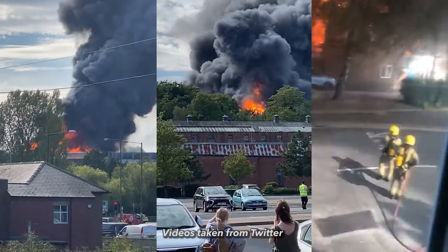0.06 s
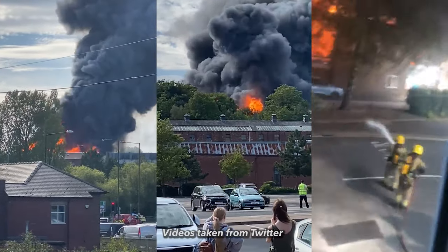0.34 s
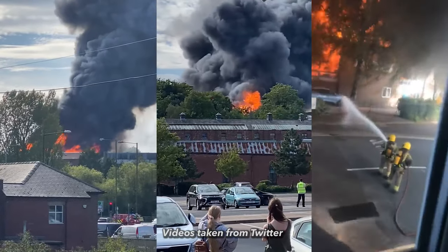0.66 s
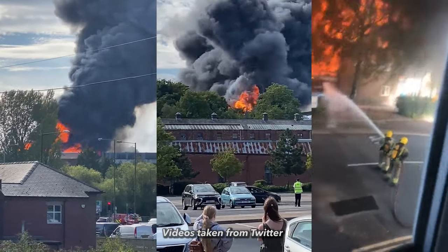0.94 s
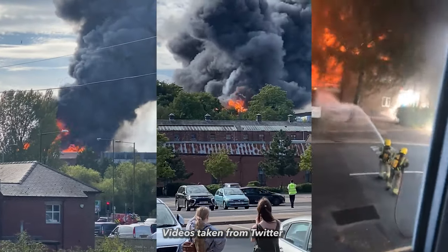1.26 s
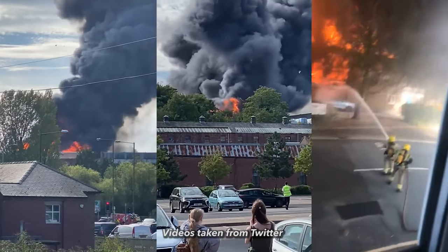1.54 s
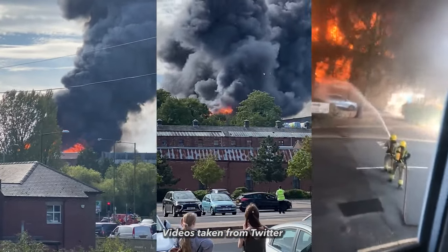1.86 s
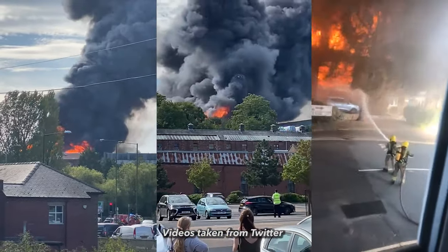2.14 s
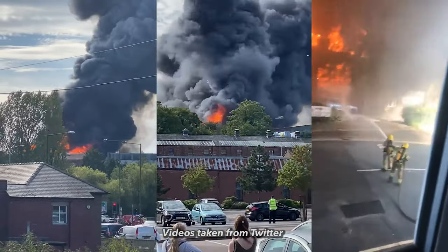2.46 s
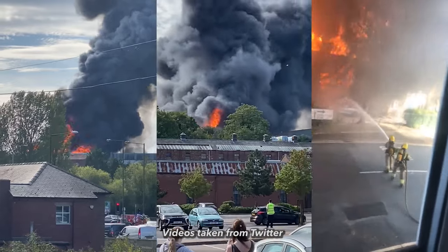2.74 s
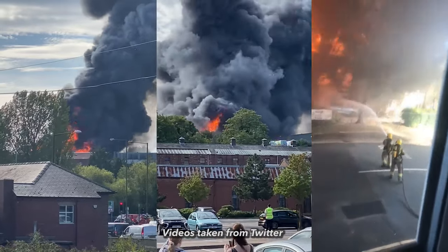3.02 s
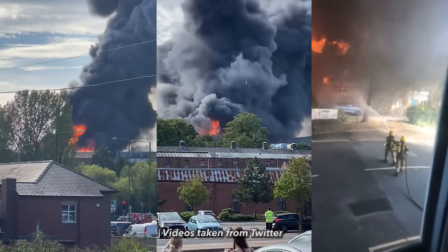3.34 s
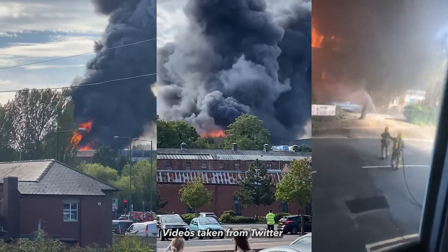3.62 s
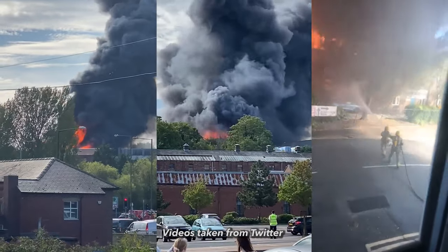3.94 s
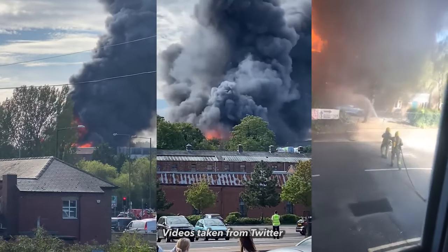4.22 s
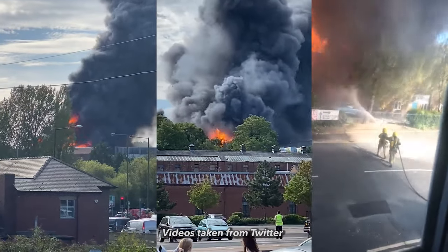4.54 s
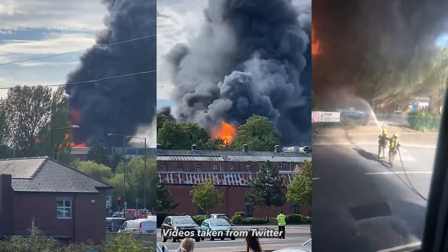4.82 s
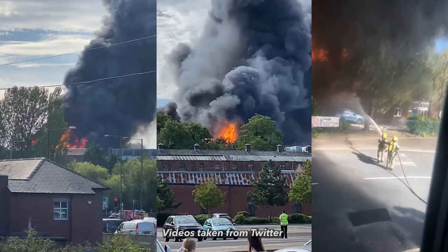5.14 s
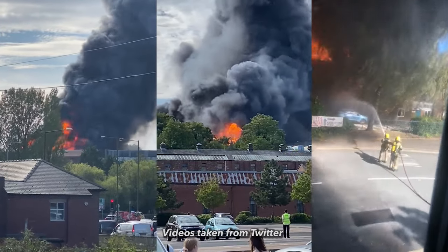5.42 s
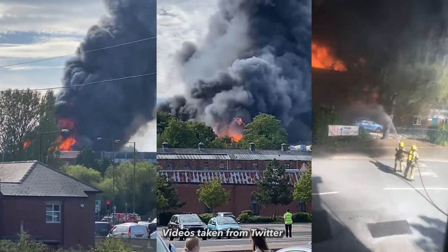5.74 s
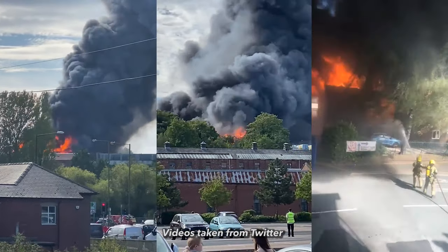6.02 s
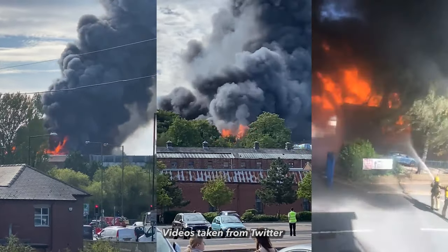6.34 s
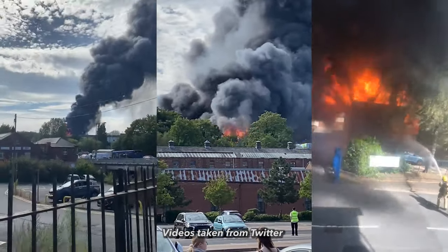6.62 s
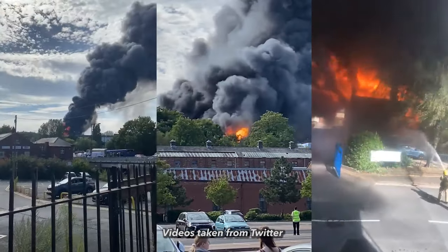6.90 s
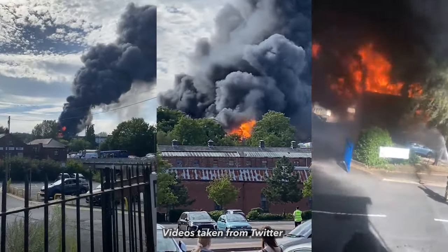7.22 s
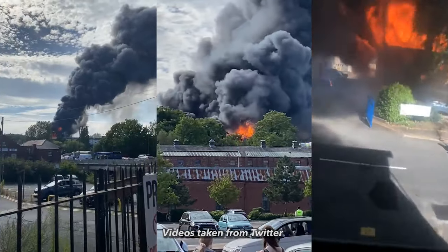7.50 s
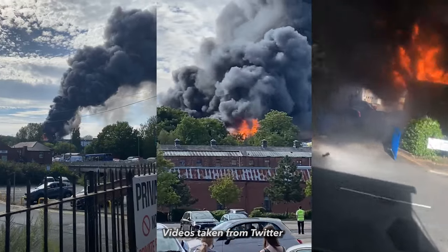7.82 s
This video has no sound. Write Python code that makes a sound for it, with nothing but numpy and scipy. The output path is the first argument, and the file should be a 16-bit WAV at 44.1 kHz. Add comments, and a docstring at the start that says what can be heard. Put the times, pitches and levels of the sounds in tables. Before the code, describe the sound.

A large building burns some way off, heard outdoors. A deep, gusting rumble and a fluttering roar of flames continue throughout, with soft sizzling, a very faint high hiss and a few tiny ticks. In the first second, deep thumps of flaring gas mix with quick cracks and hollow bangs, strongest at about 0.5 and 1.2 seconds, echoing off surrounding buildings. The roar swells briefly near 2.2 seconds. Duller bangs and thumps come with a heavier rumble around 3 to 3.5 seconds. A lull follows, with two faint, far, rising whines between 4 and 4.8 seconds. A sharp crack at about 4.8 seconds and its loud echo begin a denser run of irregular bangs, pops and low thumps, as the fire grows a little stronger. One of the loudest bangs lands near 7.6 seconds, over the continuing rumble.

```python
"""A large building on fire

A building burns some way off, heard outdoors. Billowing fire rumbles, flames roar, sizzle and pop,
and flaring gas gives deep thumps. Bursting things crack and bang, the buildings around throw the
bangs back, some loudly, and the roar briefly swells. A thin hiss, ticks and far whines sound faintly."""
import sys
import numpy as np
from scipy import signal
from scipy.fft import rfft, irfft, next_fast_len
from scipy.io import wavfile
from scipy.ndimage import uniform_filter1d

SR = 44100
rng = np.random.default_rng(int(sys.argv[2]) if len(sys.argv) > 2 else 0)


def unload_audio(sound):
    """Save the sound as a 16-bit wav file, at the path given as the first command line argument."""
    columns = np.transpose(np.atleast_2d(sound))
    # keep every value between -1 and 1, then stretch to whole-number steps
    steps = np.round(np.clip(columns, -1, 1) * 32767)
    wavfile.write(sys.argv[1], SR, steps.astype(np.int16))


N = 346626
TIME = np.arange(N) / SR

# how strongly the blaze rumbles: (time [s], level [dB])
BLAZE = [(0.0, -35.5), (0.65, -28), (0.98, -35.5), (2.69, -38.5), (3.17, -29.5), (3.55, -38), (4.71, -37.5),
         (5.17, -34.5), (5.34, -32), (6.15, -29), (6.83, -35), (7.46, -29.5), (7.86, -30.5)]


def from_db(db):
    """Turn decibels into a number to multiply a sound by."""
    return 10 ** (np.asarray(db) / 20)


def unit_power(x):
    """Scale a sound to an average power of 1."""
    return x / np.sqrt(np.mean(x ** 2) + 1e-20)


def in_time(points):
    """Join (time, value) points with straight lines."""
    return np.interp(TIME, *np.transpose(points))


def at_hz(points, hz):
    """Read between (frequency, value) points, with octaves evenly spaced."""
    known_hz, values = np.transpose(points)
    return np.interp(np.log(hz + 1), np.log(known_hz), values)


def frequencies(size):
    """The frequencies in the spectrum of `size` samples."""
    return np.arange(size // 2 + 1) * SR / size


def drift(rate_hz):
    """A smooth random wobble, about 1 in size; a higher rate wobbles faster."""
    step, warm_up = 40, 2000
    pole = np.exp(-2 * np.pi * step * rate_hz / SR)
    slow = signal.lfilter([1], [1, -2 * pole, pole * pole], rng.standard_normal(N // step + warm_up + 2))
    slow = unit_power(slow[warm_up:])
    return np.interp(np.arange(N) / step, np.arange(len(slow)), slow)


def colour(x, gain_db, size):
    """Turn frequencies up or down so that nothing sounds before its cause (minimum phase)."""
    cepstrum = irfft(np.log(from_db(gain_db)), size)
    cepstrum[1:size // 2] *= 2
    cepstrum[size // 2 + 1:] = 0
    return irfft(rfft(x, size) * np.exp(rfft(cepstrum)), size)


def evened(x, band_bins=48):
    """Give a short noise equal power in every broad band; its fine grain stays."""
    power = uniform_filter1d(np.mean(np.abs(rfft(x)) ** 2, axis=0), band_bins)
    return colour(x, 10 * np.log10(power.mean() / power), x.shape[-1])


def spread(pair, spectrum):
    """Turn two unrelated signals into one stereo sound with the given spectrum."""
    # how alike left and right are: (frequency [Hz], likeness [0-1])
    likeness = [(50, .95), (130, .83), (260, .85), (500, .8), (1000, .76), (2000, .9), (4000, .94),
                (10000, .3)]
    size = next_fast_len(N, True)
    hz = frequencies(size)
    alike = at_hz(likeness, hz)
    mid, side = rfft(pair, size) * from_db(at_hz(spectrum, hz))
    stereo = np.sqrt(1 + alike) * mid + np.sqrt(1 - alike) * side * [[1], [-1]]
    return unit_power(irfft(stereo, size)[:, :N])


def noise(spectrum):
    """Steady stereo noise."""
    return spread(rng.standard_normal((2, N)), spectrum)


def add(track, start_s, sound):
    """Mix a sound into a track."""
    start = max(round(start_s * SR), 0)
    track[..., start:start + sound.shape[-1]] += sound[..., :N - start]


def rumble(level_db=2.5, gust_db=2.0):
    """The column of fire billows: deep noise that swells with the blaze and shakes in gusts."""
    # the rumble's tone: (frequency [Hz], level [dB])
    rumble_spectrum = [(20, -43.5), (30, -27.5), (42, -2.5), (60, 3), (80, -1), (110, -11), (160, -13),
                       (300, -34), (700, -96)]
    return from_db(in_time(BLAZE) + level_db + gust_db * drift(4.4)) * noise(rumble_spectrum)


def pops(spectrum, per_s, range_db, decay_s):
    """Many small bursts of random size, each smeared on its way to us."""
    starts = rng.random(N) < per_s / SR
    power = starts * from_db(range_db * rng.random(N)) ** 2
    envelope = np.sqrt(signal.lfilter([1], [1, -np.exp(-2 / (decay_s * SR))], power + 1e-12))
    return spread(envelope * rng.standard_normal((2, N)), spectrum)


def flames(rumble_nudge=0.085, sizzle_follows=1.6):
    """Swirling flames roar, sizzle and pop; dull thuds deep inside rise and fall with the roar."""
    # how strongly the flames roar: (time [s], level [dB])
    roar_levels = [(0.0, -36.5), (1.62, -35.5), (2.55, -38.5), (3.11, -37.5), (4.7, -38.5), (5.45, -33.5),
                   (6.04, -34.5), (6.35, -37.5), (7.66, -37), (7.86, -34.5)]
    # the tone of the roar, thuds and sizzle: (frequency [Hz], level [dB])
    roar_spectrum = [(60, -2.5), (140, -13.5), (220, 0), (380, -0.5), (540, -3.5), (780, 0), (1150, -7),
                     (1550, -8.5), (2100, -22), (3500, -40.5), (7000, -76.5)]
    thud_spectrum = [(50, -27), (100, 9), (260, -1), (420, -4), (3000, -93)]
    sizzle_spectrum = [(700, -20), (1500, -9.5), (2100, 5), (3000, -4.5), (4000, -11.5), (5100, -16),
                       (6200, -24.5), (7200, -45.5)]
    roar_db, rumble_db = in_time(roar_levels), in_time(BLAZE)
    thud_db = -4 + rumble_nudge * (rumble_db - rumble_db.mean())
    sizzle_db = -54 + sizzle_follows * (roar_db - roar_db.mean())
    flutter_db = 1.33 * drift(13.4)
    roar = from_db(-1) * noise(roar_spectrum)
    roar += from_db(-7.5) * pops(roar_spectrum, per_s=56, range_db=11.5, decay_s=0.013)
    thuds = from_db(thud_db) * pops(thud_spectrum, per_s=22, range_db=16, decay_s=0.016)
    sizzle = from_db(-2.5) * noise(sizzle_spectrum)
    sizzle += from_db(-8.5) * pops(sizzle_spectrum, per_s=34, range_db=8, decay_s=0.034)
    return from_db(roar_db + flutter_db) * (roar + thuds) + from_db(sizzle_db + flutter_db) * sizzle


def hiss(swell_s=0.039, level_db=2.5):
    """A thin, high hiss that swells now and then."""
    # its slow rise and fall, and its brief swells: (time [s], level [dB])
    hiss_levels = [(0.0, -80), (0.68, -77.5), (3.13, -87.5), (6.24, -79.5), (6.98, -87.5), (7.86, -83.5)]
    swell_peaks = [(2.75, -75), (5.61, -73)]
    # its tone: (frequency [Hz], level [dB])
    hiss_spectrum = [(6500, -61), (8500, -7.5), (10000, -7), (11800, -11), (13500, -31), (16000, -37)]
    swells = sum(from_db(db) * np.exp(-((TIME - peak_s) / swell_s) ** 2) for peak_s, db in swell_peaks)
    return (from_db(in_time(hiss_levels) + level_db) + swells) * noise(hiss_spectrum)


def bangs(level_db=27, crack_db=-8, shock_s=0.00083, ring_width_hz=68, size=6144):
    """A bang is a shock and a short tearing noise, then a crackling scatter off the wreckage."""
    # bangs, their loud echoes off the buildings (1.266, 4.97, 5.372 s) and a brief, soft swell of
    # the roar (2.19 s): (time [s], strength [dB], hollow ring [Hz], upper ring [Hz], bass [dB],
    # rise [s], scatter decay [s], dulling [dB; below 0 is sharper])
    events = [(.069, -19, 560, 1180, -3.5, 0.002, 0.022, 22.5),
              (.109, -17.5, 700, 1460, -14, 0.0016, 0.032, -2.5),
              (.223, -19.5, 790, 1370, -9, 0.0015, 0.017, 9),
              (.456, -16.5, 775, 1390, -2.5, 0.0079, 0.044, 0.5),
              (.481, -12.5, 746, 1330, 1.5, 0.0025, 0.0095, 6),
              (.537, -24, 1390, 2450, -7, 0.00079, 0.0072, -4),
              (1.001, -23.5, 422, 1260, -3.5, 0.0015, 0.0044, 9.5),
              (1.03, -22.5, 302, 1520, 6, 0.0096, 0.014, 8),
              (1.148, -11.5, 770, 1540, 0.5, 0.0023, 0.017, -3),
              (1.162, -13, 770, 1520, -3, 0.0012, 0.0093, 2.5),
              (1.266, -17, 820, 1194, -1, 0.0035, 0.012, 8.5),
              (1.576, -18, 666, 1110, -2, 0.0023, 0.019, 5.5),
              (1.718, -19.5, 570, 1680, 0, 0.0021, .028, 3),
              (1.818, -19.5, 427, 1190, 2, 0.0028, 0.0092, 30),
              (2.19, -18, 830, 1380, -10.5, 0.021, 0.23, 12.5),
              (2.577, -22.5, 480, 1620, 1, 0.0012, 0.012, 7),
              (2.832, -27, 510, 1275, 4.5, 0.0029, 0.017, 2),
              (3.051, -18, 258, 1690, 7, 0.0019, 0.019, 10.5), (3.177, -20, 446, 1415, 6, 0.0064, .03, 4),
              (3.346, -27.5, 285, 1470, 15.5, 0.0097, 0.014, 7),
              (4.838, -9.5, 770, 1930, -10.5, 0.0023, 0.014, -1.5),
              (4.891, -29, 780, 2600, -2.5, .002, 0.0071, -7),
              (4.952, -16, 870, 2000, -9.5, 0.0028, 0.0058, 15),
              (4.97, -14, 810, 1950, 0, .002, 0.039, 3.5), (5.242, -11.5, 665, 2480, -6, 0.0017, 0.004, 4),
              (5.267, -20, 397, 1350, 2, 0.0018, 0.03, -4.5),
              (5.372, -21, 350, 1890, 5.5, 0.0043, 0.0083, -4.5),
              (5.405, -21.5, 380, 1360, -7, 0.0037, 0.027, 1),
              (5.469, -23.5, 338, 1450, 5, 0.0069, 0.017, 5.5),
              (5.651, -26, 297, 1390, 9.5, 0.0033, 0.0051, 29),
              (5.775, -26, 290, 1280, 16, 0.01, 0.012, 29.5),
              (5.809, -13.5, 864, 2060, -6.5, 0.0021, 0.034, 3.5),
              (5.848, -20, 745, 1250, -3.5, 0.0065, 0.026, 5.5),
              (5.963, -17.5, 730, 1450, -3, 0.0015, 0.018, 14),
              (6.018, -15.5, 520, 990, -1.5, 0.003, 0.026, 14),
              (6.17, -19, 324, 1510, 6.5, 0.0024, 0.019, 12.5),
              (6.531, -22, 383, 1220, 3, 0.0022, 0.018, 0.5), (6.544, -15, 647, 1820, 0, 0.0035, 0.011, 12),
              (6.673, -21, 363, 2130, 4, .005, 0.042, 10), (6.72, -22, 460, 1650, 0.5, 0.005, 0.022, 5),
              (6.877, -19, 426, 1500, -1, 0.01, 0.03, 7), (6.935, -23, 815, 1400, -7, .003, 0.018, 7),
              (7.015, -16.5, 715, 1720, -3.5, 0.0012, 0.018, 13.5),
              (7.051, -18, 830, 1640, 2, .0018, 0.024, 12),
              (7.205, -26.5, 696, 1490, -6, 0.0059, 0.023, -3),
              (7.244, -17, 672, 1400, 0, 0.01, 0.046, 5.5),
              (7.343, -17.5, 773, 1470, -7, 0.011, 0.021, -4.5),
              (7.631, -9, 472, 1615, -11, 0.0065, 0.031, 6),
              (7.747, -17, 627, 1400, -1.5, 0.00083, 0.0055, 32.5)]
    # a bang's higher notes: (pitch [x upper ring], boost [x hollow ring's boost])
    upper_notes = [(.68, .25), (1, .7), (1.43, .5), (2.03, .6), (2.8, .6)]
    # the tone all bangs share: (frequency [Hz], level [dB])
    bang_spectrum = [(30, -23.5), (100, 11.5), (200, -1), (350, 7.5), (520, 2), (740, 4), (1100, 1),
                     (1600, 3), (2300, 3), (3200, -6.5), (5000, -18), (6300, -31.5), (7500, -58.5),
                     (14000, -62)]
    out, t, hz = np.zeros((2, N)), TIME[:size], frequencies(size)
    crackle = unit_power(noise([(20, 0)]) * from_db(2.5 * drift(rate_hz=330)))
    fade = signal.windows.tukey(2 * size, .5)[size:]
    for k, (start_s, strength_db, ring_hz, upper_hz, bass_db, rise_s, decay_s, dull_db) in enumerate(events):
        above_mean_db = strength_db - np.mean(events, axis=0)[1]
        # strong, short bangs hit harder at the front
        front_db = -5 + 0.17 * above_mean_db - 3.5 * np.log2(decay_s / 0.013)
        scatter = np.exp(-t / decay_s) * (1 - np.exp(-t / rise_s))
        scatter /= np.linalg.norm(scatter)
        tear = t * np.exp(-t / rise_s)
        envelope = np.hypot(scatter, from_db(front_db) * tear / np.linalg.norm(tear))
        # the shock pushes, then briefly sucks back; distance rounds its edge
        shock = (t == 0) - np.exp(-t / shock_s) / (shock_s * SR)
        shock = signal.sosfilt(signal.butter(1, 1300, fs=SR, output="sos"), shock)
        shock *= from_db(front_db - 0.5 - 4.5 * np.log2(rise_s / 0.0021))  # a slow rise weakens it
        grains = evened(fade * envelope * crackle[:, k * size:(k + 1) * size])
        sound = unit_power(grains) * np.linalg.norm(envelope) / np.sqrt(size) + shock
        tone = [(340, bass_db), (650, 0.0012), (1250, -0.45 * dull_db), (2200, crack_db - dull_db)]
        tone_db = at_hz(tone, hz) + at_hz(bang_spectrum, hz)
        # a hollow thing rings briefly, and more so the stronger the bang
        notes = [(ring_hz, 1)] + [(multiple * upper_hz, boost) for multiple, boost in upper_notes]
        rings = sum(boost / (1 + ((hz - note_hz) / ring_width_hz) ** 2) for note_hz, boost in notes)
        hollow_db = (7.2 + 0.33 * above_mean_db) * rings
        add(out, start_s, colour(sound, level_db + strength_db + tone_db + hollow_db, size))
    return out


def echoes(x, tail_s=0.79, tail_db=-8, echo_s=0.13, smear_s=0.017, echo_db=-14.5, band_hz=(170, 3800)):
    """Walls and trees send back a fading tail; a row of house fronts adds one smeared echo."""
    t = TIME[:SR]
    mid, side = rng.standard_normal((2, SR))
    tail = from_db(-60 * t / tail_s) * (1 - np.exp(-t / 0.00057))
    echo = (t > echo_s) * np.exp(-np.abs(t - echo_s) / smear_s)
    shape = from_db(tail_db) * tail / np.linalg.norm(tail)
    shape += from_db(echo_db) * echo / np.linalg.norm(echo)
    response = shape * (mid + 0.18 * side * np.array([[1], [-1]]))
    response = signal.sosfilt(signal.butter(1, band_hz, "band", fs=SR, output="sos"), response)
    return signal.fftconvolve(x, response, axes=1)[:, :N]


def thumps(rise_cycles=0.64, level_db=-3):
    """Flaring gas swings the air pressure up and down for a few slow cycles."""
    # gas flaring up: (time [s], level [dB], pitch [Hz])
    flares = [(0.132, -10, 67), (0.264, -16, 61.8), (0.273, -23, 294), (0.385, -20.5, 60.4),
              (0.462, -14, 81), (0.558, -11, 59.7), (0.691, -12.5, 59.3), (0.764, -17.5, 63.6),
              (1.612, -17.5, 290), (1.633, -16, 67), (2.159, -19, 135.4), (3.017, -15.5, 87),
              (3.098, -19.5, 260), (3.199, -20.5, 94.5), (3.249, -18.5, 250), (3.314, -19.5, 67),
              (3.355, -15.5, 137), (3.491, -22, 166), (3.572, -18, 130.7), (4.721, -19.5, 64.3),
              (5.097, -18.5, 78), (5.247, -20.5, 129.5), (5.437, -18.5, 86.6), (5.477, -17, 58.7),
              (5.791, -16.5, 76.5), (5.925, -17.5, 68.7), (5.935, -16.5, 247), (6.131, -14, 69.4),
              (6.15, -14.5, 173), (6.214, -16, 69), (6.363, -15.5, 69), (6.821, -19, 146.7),
              (6.907, -16, 75.3), (7.033, -16.5, 66.8), (7.287, -14.5, 88.3), (7.455, -16.5, 73.7),
              (7.586, -14, 66), (7.634, -11, 63.4), (7.776, -16, 64)]
    out, t = np.zeros(N), TIME[:SR // 4]
    for (start_s, db, pitch_hz), phase in zip(flares, rng.random(len(flares))):
        swing = np.sin(2 * np.pi * (pitch_hz * t + phase))
        age = pitch_hz * t / rise_cycles
        add(out, start_s, from_db(db + level_db) * swing * age * np.exp(1 - age))
    return out


def ticks(decay_s=0.001, level_db=-7):
    """Tiny dry clicks close by, each a flick of noise."""
    # the clicks: (time [s], level [dB])
    clicks = [(0.1618, -42), (0.2365, -47), (1.297, -45), (4.953, -47)]
    out, t = np.zeros(N), TIME[:SR // 50]
    for (start_s, db), grit in zip(clicks, rng.standard_normal((len(clicks), len(t)))):
        add(out, start_s, from_db(db + level_db) * grit * np.exp(-t / decay_s))
    return out


def whines(slide_s=0.0642, wobble=0.0085):
    """Thin, far tones swell, slide towards their pitch and fade, unsteady in the moving air."""
    # (time [s], length [s], pitch [Hz], level [dB], low start [share of pitch; below 0 starts high])
    whistles = [(2.717, 0.062, 10400, -75, -0.015), (4.0, 0.34, 844, -41, 0.11),
                (4.481, 0.29, 710, -43, 0.16), (6.81, 0.09, 4080, -71, -0.16)]
    out = np.zeros(N)
    for start_s, length_s, pitch_hz, db, low_start in whistles:
        t = TIME[:int(length_s * SR)]
        hz = pitch_hz * (1 - low_start * np.exp(-t / slide_s) + wobble * drift(40)[:len(t)])
        tone = np.sqrt(2) * np.sin(2 * np.pi * np.cumsum(hz) / SR)
        add(out, start_s, from_db(db) * np.sin(np.pi * t / length_s) * tone)
    return out


def scene():
    """Mix the fire, its bangs, their echoes and the far whines."""
    banging = bangs()
    fire = rumble() + thumps() + flames() + hiss() + ticks()
    return fire + banging + echoes(banging) + whines()


def record(dry, cutoff_hz=15500):
    """The microphone's two openings differ in timing and level; the highest treble is cut."""
    # how far the left is ahead: (frequency [Hz], phase [radians])
    left_lead = [(130, 0), (260, -.35), (500, -.62), (1030, -1.15), (1400, -.45), (2000, 0), (2600, .4),
                 (5000, .65), (9000, -.75)]
    # how much louder the left is: (frequency [Hz], level [dB])
    left_boost = [(60, .8), (130, 1), (270, 3.2), (550, 2.4), (1100, -.5), (2000, 1.4), (3500, 0)]
    size = next_fast_len(N + SR // 8, True)
    hz = frequencies(size)
    left_gain = np.sqrt(from_db(at_hz(left_boost, hz))) * np.exp(.5j * at_hz(left_lead, hz))
    heard = irfft(rfft(dry, size) * np.array([left_gain, 1 / left_gain]), size)[:, :N]
    return signal.sosfilt(signal.ellip(10, .1, 70, cutoff_hz, fs=SR, output="sos"), heard)


dry = scene()
out = record(dry)
unload_audio(out)
```